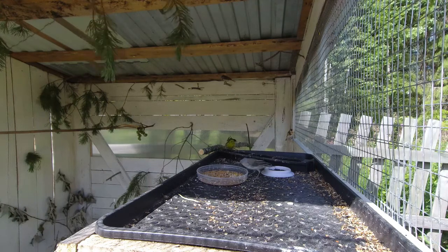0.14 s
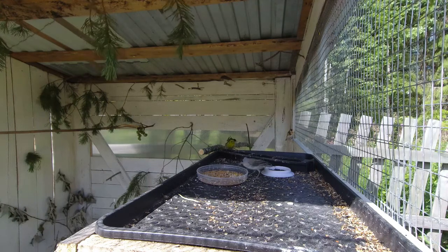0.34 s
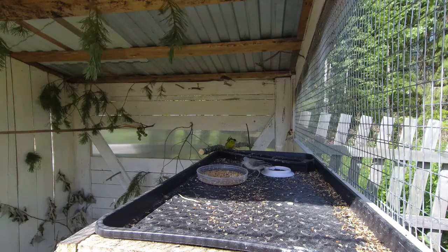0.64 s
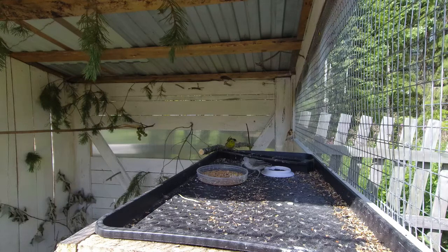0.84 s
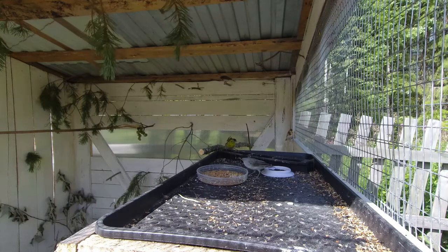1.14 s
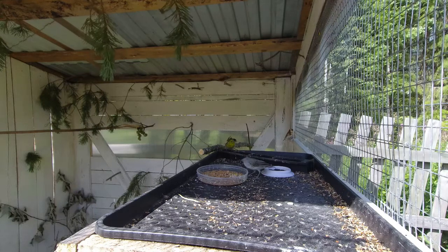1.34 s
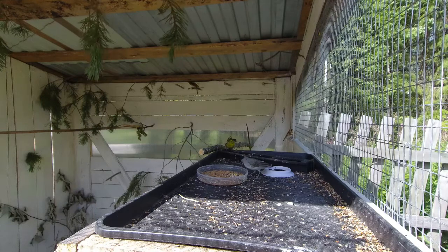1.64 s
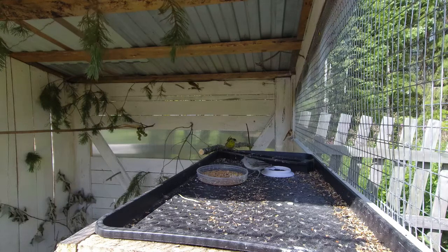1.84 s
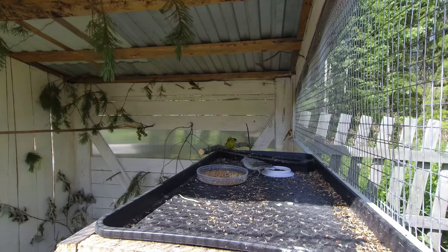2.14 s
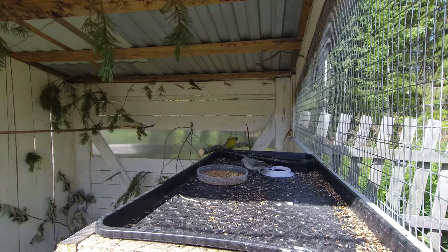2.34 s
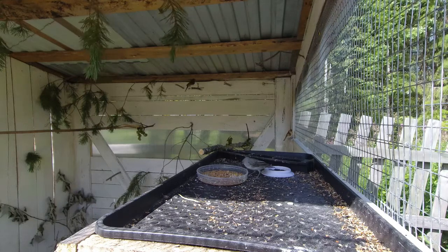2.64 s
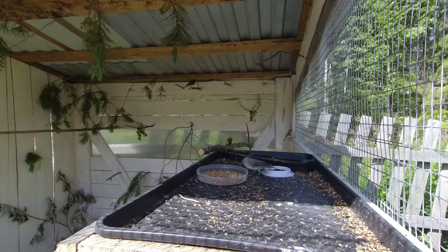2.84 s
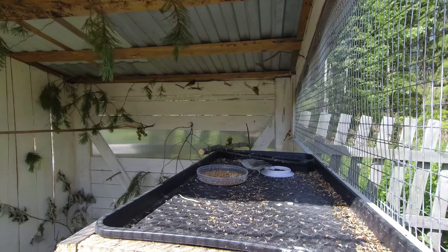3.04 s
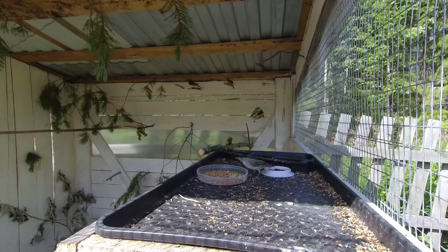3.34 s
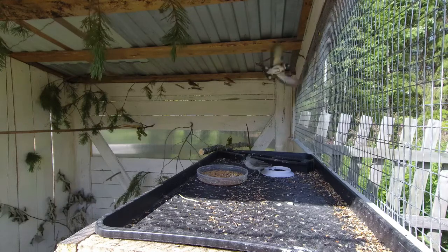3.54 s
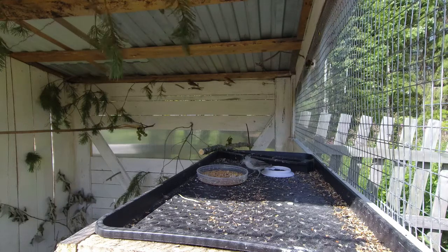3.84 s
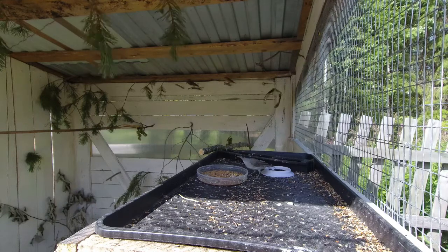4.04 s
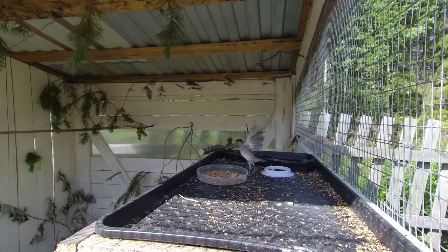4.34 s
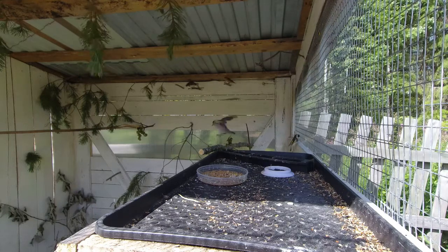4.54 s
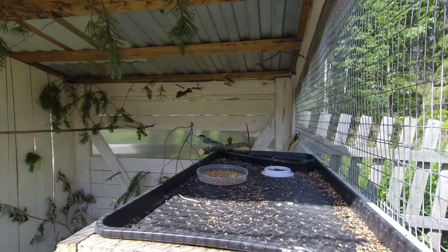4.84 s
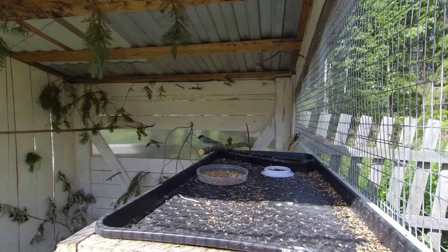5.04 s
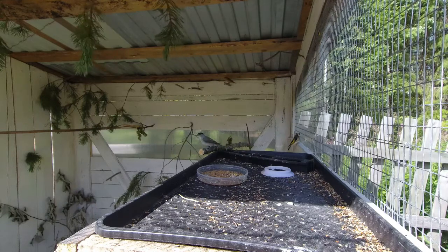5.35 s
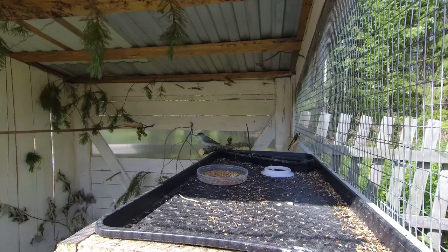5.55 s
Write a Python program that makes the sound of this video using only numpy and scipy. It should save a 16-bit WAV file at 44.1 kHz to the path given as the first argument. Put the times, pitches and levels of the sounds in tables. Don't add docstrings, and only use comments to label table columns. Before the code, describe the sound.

In a board-walled aviary, faint leaf hiss and low wind lead to a seed snap, light pecks, fluttering wings and a cluster of sharp chirps.

```python
import sys
import numpy as np
from scipy import signal
from scipy.fft import rfft, irfft, next_fast_len
from scipy.io import wavfile
from scipy.ndimage import uniform_filter1d

SR = 44100
rng = np.random.default_rng(int(sys.argv[2]) if len(sys.argv) > 2 else 0)


def decibels_to_gain(level_db):
    exponent = np.asarray(level_db, float) / 20
    return 10 ** exponent


def log_audio(samples):
    frames = np.atleast_2d(samples).T
    limited = np.clip(frames, -1, 1)
    pcm = np.round(limited * 32767).astype(np.int16)
    wavfile.write(sys.argv[1], SR, pcm)


N = 250929
FRAME = 2048


def evened(x):
    return x / np.sqrt(np.mean(x ** 2) + 1e-20)


def add(mix, s, sound):
    part = mix[round(s * SR):][:len(sound)]
    part += sound[:len(part)]


def coloured(points):
    size = next_fast_len(N)
    f, db = np.transpose(points)
    hz = np.fft.rfftfreq(size, 1 / SR)
    shape = decibels_to_gain(np.interp(np.log(hz + 0.15), np.log(f), db, left=-90, right=-90))
    return evened(irfft(rfft(rng.standard_normal(size)) * shape, size)[:N])


def wander(span_s):
    size = max(int(span_s * SR), 2)
    once = uniform_filter1d(rng.standard_normal(N), size)
    return evened(uniform_filter1d(once, size))


def flights():
    # (start [s], length [s], low thrust [dB], rush [dB])
    passes = [(0.097, 0.17, -62, -66), (1.103, 0.11, -61, -71), (1.622, 0.35, -56.5, -72),
              (2.555, 0.16, -69, -63), (2.757, 0.41, -58.5, -71), (3.29, .22, -51, -63),
              (3.527, 0.18, -51, -61), (3.61, .3, -49, -53.5), (3.9, .2, -58, -66), (4.1, .25, -55, -66),
              (4.615, 0.29, -60.5, -65), (5.34, .14, -57, -63), (5.47, .15, -54, -58),
              (5.664, 0.068, -52.5, -58)]
    rise, beats_per_s, beat_depth = .25, 14.0, .5
    thrust, rush = np.zeros(N), np.zeros(N)
    for s, length, thrust_db, rush_db in passes:
        u = np.arange(0, 1, 1 / (length * SR))
        shape = np.sin(np.pi / 2 * np.minimum(u / rise, (1 - u) / (1 - rise))) ** 2
        shape *= 1 - beat_depth * np.cos(2 * np.pi * beats_per_s * u * length)
        add(thrust, s, decibels_to_gain(2 * thrust_db) * shape)
        add(rush, s, decibels_to_gain(2 * rush_db) * shape)
    return np.sqrt(thrust), np.sqrt(rush)


def air():
    # (time [s], level [dB])
    breeze = [(0.0, -53.5), (0.24, -47), (0.52, -53.5), (0.65, -45), (1.11, -51.5), (1.25, -42),
              (1.35, -50), (2.57, -45.5), (2.69, -58), (2.74, -48), (3.8, -41.5), (3.88, -49),
              (5.34, -48.5), (5.37, -44), (5.47, -62), (5.69, -45.5)]
    # (frequency [Hz], density [dB per Hz])
    buffet_spectrum = [(1.2, -43), (2.0, 4), (16, 2), (29, -10.5), (45, -12), (58, -46), (99, -120)]
    # (frequency [Hz], density [dB per Hz])
    rumble_spectrum = [(21, -38), (35, -2.5), (81, -9), (280, -22), (360, -36), (620, -120)]
    # (frequency [Hz], density [dB per Hz])
    rush_spectrum = [(130, -20), (220, -2), (420, 0.5), (1150, -5.5), (1330, -6), (1660, -8.5),
                     (2200, -10.5), (2860, -25), (4840, -120)]
    rumble_db, rumble_share = -61, .15
    rush_db, rush_share = -60.5, .05
    downwash_db = 7.5

    breeze_db = np.interp(np.arange(N) / SR, *np.transpose(breeze))
    gust_db = breeze_db - breeze_db.mean()
    thrust, rush = flights()
    buffet_gain = np.hypot(decibels_to_gain(breeze_db), decibels_to_gain(downwash_db) * thrust)
    rumble_gain = np.hypot(decibels_to_gain(rumble_db + rumble_share * gust_db), thrust)
    rush_gain = np.hypot(decibels_to_gain(rush_db + rush_share * gust_db), rush)
    out = coloured(buffet_spectrum) * buffet_gain
    out += coloured(rumble_spectrum) * rumble_gain * decibels_to_gain(0.92 * wander(0.036))
    return out + coloured(rush_spectrum) * rush_gain * decibels_to_gain(0.17 * wander(0.014))


def hiss():
    # (frequency [Hz], density [dB per Hz])
    hiss_spectrum = [(1060, -36), (1800, -4), (2450, -1), (2660, 0), (2940, 0), (3960, 2), (4580, 1),
                     (5210, 0.5), (6650, -1), (7480, -4), (11000, -8), (12300, -6.5), (14800, -8),
                     (15800, -3.5)]
    # (frequency [Hz], level [dB rms])
    whistles = [(10384, -86), (10449, -87), (11693, -88), (14998, -75)]
    hiss_db, rise_db_per_s, stir_db = -59, 0.3069, -12

    t = np.arange(N) / SR
    thrust = flights()[0]
    gain = np.hypot(decibels_to_gain(hiss_db + rise_db_per_s * t), decibels_to_gain(stir_db) * thrust)
    out = coloured(hiss_spectrum) * gain * decibels_to_gain(.5 * wander(0.016))
    for hz, db in whistles:
        drift = np.cumsum(5.5 * wander(.04)) / SR
        out += 1.6 * decibels_to_gain(db + 2 * wander(.03)) * np.sin(2 * np.pi * (hz * t + drift))
    return out


def feathers():
    # (centre [s], length [s], level [dB])
    swishes = [(1.747, .04, -61), (3.082, .04, -59), (3.292, 0.038, -62), (3.553, .04, -59),
               (3.601, 0.048, -59), (3.704, 0.1, -59.5), (4.097, .05, -62), (4.19, .08, -68),
               (4.27, .05, -63)]
    # (frequency [Hz], density [dB per Hz])
    feather_spectrum = [(4000, -22), (7000, -1.5), (11000, -0.5), (15000, 1.5), (15800, -12)]
    gate = np.zeros(N)
    for s, length, db in swishes:
        add(gate, s - length / 2, decibels_to_gain(db) * np.hanning(round(length * SR)))
    return coloured(feather_spectrum) * gate * decibels_to_gain(3.3 * wander(0.0033))


def aviary(sound, wet_db, wall_s, wall_db, t60):
    gap_s = .0012
    t = np.arange(.002, .2, gap_s)
    late, strength = rng.random((2, len(t)))
    taps = np.zeros(SR // 4)
    taps[((t + gap_s * late) * SR).astype(int)] = (2 * strength - 1) * decibels_to_gain(-60 * t / t60)
    taps *= decibels_to_gain(wet_db) / np.linalg.norm(taps)
    taps[round(wall_s * SR)] += decibels_to_gain(wall_db)
    taps = signal.lfilter([.8], [1, -.3], taps)
    taps[0] = 1
    return signal.fftconvolve(sound, taps)


def knock(db, hz, t60):
    t = np.arange(3000) / SR
    decay = decibels_to_gain(db - 60 * t / t60)
    return decay * np.clip(t / 0.0014, 0, 1) * np.sin(2 * np.pi * hz * t)


def crack(db, hz, width_hz):
    t = np.arange(-40, 41) / SR
    return decibels_to_gain(db) * np.exp(-(np.pi * width_hz * t) ** 2 / 2) * np.cos(2 * np.pi * hz * t)


def feeding(mix):
    # (time [s], peak [dB], ring [Hz], t60 [s])
    pecks = [(1.5953, -54, 1376, 0.05), (2.0437, -49, 1310, 0.044), (2.6515, -43.5, 1304, 0.039),
             (2.7931, -54, 1320, 0.05), (3.4095, -49.5, 1320, 0.04), (3.6534, -58, 1340, 0.05),
             (3.6825, -50, 1240, 0.046), (3.706, -53, 1180, 0.055), (4.6517, -52.5, 1225, 0.047),
             (4.6733, -56, 1560, 0.05), (4.818, -49.5, 1433, 0.054)]
    # (time [s], peak [dB], ring [Hz], t60 [s])
    thuds = [
        (2.608, -49, 530, 0.09),
        (2.609, -49, 353, 0.08),
        (2.609, -51, 900, .04),
        (2.609, -54, 1500, .03),
        (3.62, -41, 208, 0.049),
    ]
    # (time [s], peak [dB], centre [Hz], width [Hz])
    cracks = [
        (1.9065, -32.5, 11000, 4450),
        (1.9085, -43, 7500, 3000),
        (1.9088, -47, 14500, 3000),
    ]
    for s, *blow in pecks + thuds:
        add(mix, s, aviary(knock(*blow), wet_db=-8, wall_s=0.00735, wall_db=-7, t60=0.17))
    for s, *snap in cracks:
        snapped = aviary(crack(*snap), wet_db=1.5, wall_s=.006, wall_db=-8, t60=.05)
        add(mix, s - 40 / SR, snapped)


def chirp(length, first_hz, last_hz, db, over_db, rise, steep, rasp, bend, fade_db, start=0.27):
    u = np.arange(0, 1, 1 / (length * SR))
    hz = last_hz - (last_hz - first_hz) * (1 - u) ** bend
    turn = 2 * np.pi * np.cumsum(hz) / SR
    swell = start + (1 - start) * np.clip(u / rise, 0, 1) ** steep
    swell *= decibels_to_gain(fade_db * np.clip(u - rise, 0, 1))
    swell *= np.clip(np.minimum(u / 0.038, (1 - u) / 0.15), 0, 1)
    beats = 2 * np.pi * (300 * u * length + rng.random())
    swell *= 1 + np.clip(rasp, 0, 1) * np.sin(beats + 1.1 * np.sin(0.373 * beats))
    third_db = np.interp(last_hz, [3000, 4000], [-13, -1.5])
    early_db = 7 * np.clip(1 - u / rise, 0, 1)
    overtones = np.sin(2 * turn) + decibels_to_gain(third_db) * np.sin(3 * turn)
    tone = np.sin(turn) + decibels_to_gain(over_db + early_db) * overtones
    return np.sqrt(2) * decibels_to_gain(db) * swell * tone


def song(mix, calls, manner, wet_db, wall_db, wall_s, strain_db):
    slur, rise, sag_db, steep_ease, steep_full, rasp_ease, rasp_full = manner
    ease = np.array([-28.5, steep_ease, rasp_ease])
    full = np.array([-12, steep_full, rasp_full])
    facing_db, turn_share = -40, .6
    for s, length, last_hz, db, strain in calls:
        over_db, steep, rasp = ease + (full - ease) * strain
        bend = np.interp(last_hz, [3100, 3500], [2.3, 1.75])
        voice = chirp(length, slur * last_hz, last_hz, db, over_db, rise, steep, rasp, bend, sag_db)
        turned_db = turn_share * (facing_db - db) + strain_db * strain
        add(mix, s, aviary(voice, wet_db + turned_db, wall_s, wall_db + turned_db, t60=0.11))


def songbird(mix):
    # (start [s], length [s], last pitch [Hz], level [dB], strain [0-1])
    chips = [
        (1.3365, .024, 3130, -42.5, .55),
        (2.942, 0.021, 3040, -41, .2),
        (3.165, 0.017, 3130, -38, .1),
        (3.370, .026, 3040, -42, 1),
        (4.094, .019, 2910, -44.5, .15),
    ]
    # (start [s], length [s], last pitch [Hz], level [dB], strain [0-1])
    sweeps = [
        (1.4595, .028, 4500, -43, .1),
        (3.065, 0.029, 4000, -42, .38),
        (3.272, .031, 4090, -43, .72),
    ]
    # (start [s], length [s], last pitch [Hz], level [dB], strain [0-1])
    slurs = [
        (3.4745, .025, 4230, -36, .06),
        (3.598, .032, 3430, -38, .45),
        (4.248, .024, 3790, -39, .02),
    ]
    # (first over last pitch [ratio], swell time [share of length], sag [dB],
    # swell steepness at ease, at full strain [exponent], rasp at ease, at full strain [depth])
    chip_manner = (.83, .47, -11, 5.5, 13.0, .12, .16)
    sweep_manner = (.685, .28, -11, .5, 4.0, .4, 1.1)
    slur_manner = (.695, .42, -8, 2.2, 1.6, .2, .7)
    song(mix, chips, chip_manner, wet_db=-6.5, wall_db=-13, wall_s=.009, strain_db=-2.5)
    song(mix, sweeps, sweep_manner, wet_db=-9, wall_db=-14.5, wall_s=.012, strain_db=10.5)
    song(mix, slurs, slur_manner, wet_db=-5, wall_db=-9, wall_s=.0095, strain_db=-6)


def scene():
    mix = air() + hiss() + feathers()
    feeding(mix)
    songbird(mix)
    return np.array([mix, mix])


def starved(x):
    # (block number [half blocks], window steepness [1-4], step over typical level [dB])
    thinned = [(6, 1, 11), (15.875, 2, 11), (52, 1, 9), (71, 1, 9), (73, 1, 10), (95, 1, 10), (117, 1, 8.5),
               (128, 1, 10), (138, 1, 10.5), (155.875, 2, 12), (161, 1, 12), (187, 1, 8), (235, 1, 10),
               (236, 1, 11.5), (238, 1, 11.5), (239, 1, 10), (243, 1, 10.5)]
    first_centre = 557
    out = x.copy()
    n, k = np.arange(FRAME) + .5, np.arange(FRAME // 2) + .5
    lines = np.cos(2 * np.pi / FRAME * np.outer(k, n + FRAME / 4)) * np.sqrt(4 / FRAME)
    slope = 1 - 2 * abs(2 * n / FRAME - 1)
    spared_db = np.interp(k * SR / FRAME, [600, 1800, 6000, 8000], [5, 1.5, 1, 0])
    for frame, steep, step_db in thinned:
        start = round(first_centre + (frame - 1) * FRAME / 2)
        window = np.sin(np.pi / 4 * (1 + np.clip(steep * slope, -1, 1)))
        z = lines @ (window * x[start:][:FRAME])
        band = uniform_filter1d(abs(z), size=40)
        typical = band ** .7 * np.median(band[:700]) ** .3
        lost = z * (abs(z) < typical * decibels_to_gain(step_db - spared_db))
        add(out, start / SR, -window * (lost @ lines))
    return out


def split():
    moments = [.425, .73, 1.105, 1.54, 2.122, 2.122, 2.425, 2.562, 3.795, 3.795, 3.842, 3.888, 3.888, 3.935,
               4.585, 4.608, 4.608, 4.795, 5.397, 5.397]
    level_db, tilt_db_per_octave, width_octaves = -67.5, -2.0, .35
    side, hz = np.zeros(N), np.fft.rfftfreq(FRAME, 1 / SR)
    octaves_up = 1.6 * rng.permutation(len(moments)) / len(moments)
    for s, up in zip(moments, octaves_up):
        low_hz = 4300 * 2 ** up
        z = rfft(rng.standard_normal(FRAME)) * (hz > low_hz) * (hz < low_hz * 2 ** width_octaves)
        burst = evened(irfft(z)) * signal.windows.tukey(FRAME, .9)
        add(side, s - FRAME / 2 / SR, decibels_to_gain(level_db + tilt_db_per_octave * up) * burst)
    return side


def roll_off(x):
    return signal.sosfilt(signal.butter(12, 16550, fs=SR, output="sos"), x)


def record(dry):
    mid, side = starved(dry[0]), split()
    mix = np.array([mid + side, mid - side])
    return roll_off(mix)


dry = scene()
out = record(dry)
log_audio(out)
```